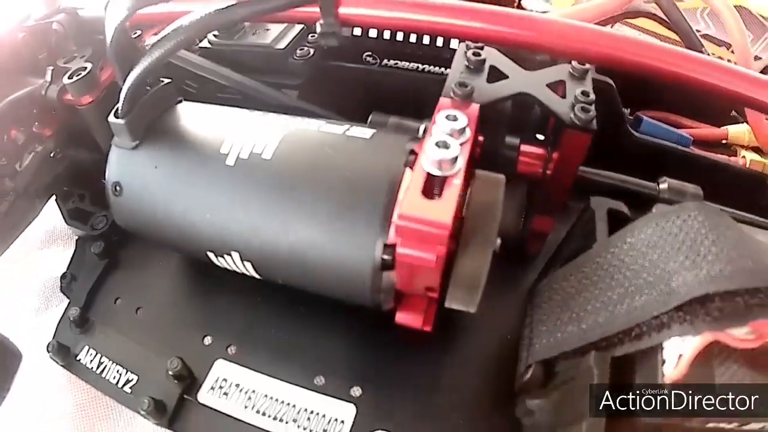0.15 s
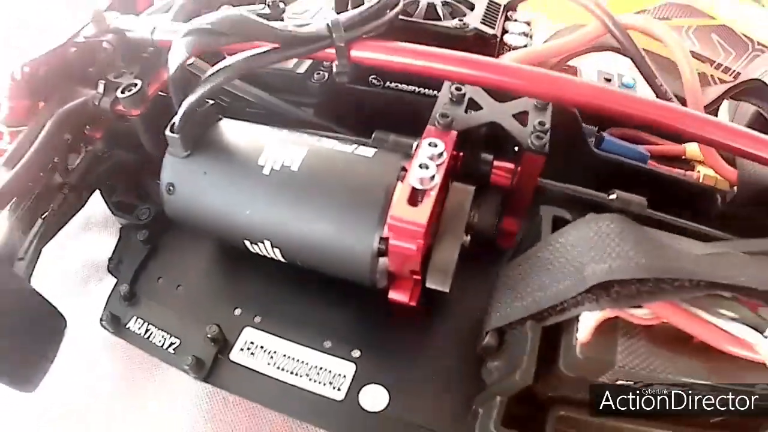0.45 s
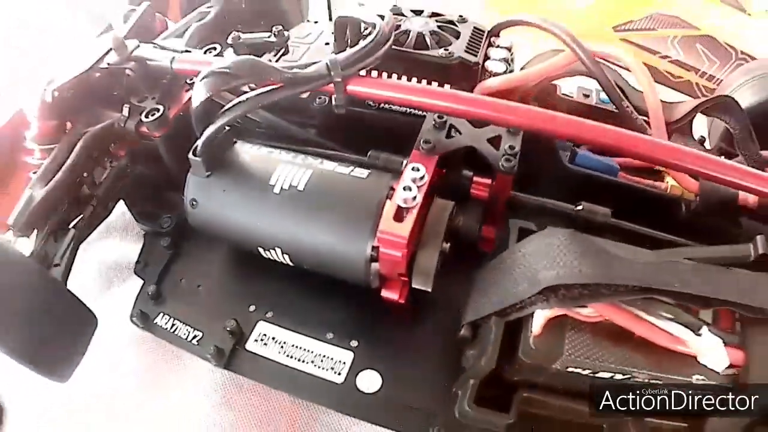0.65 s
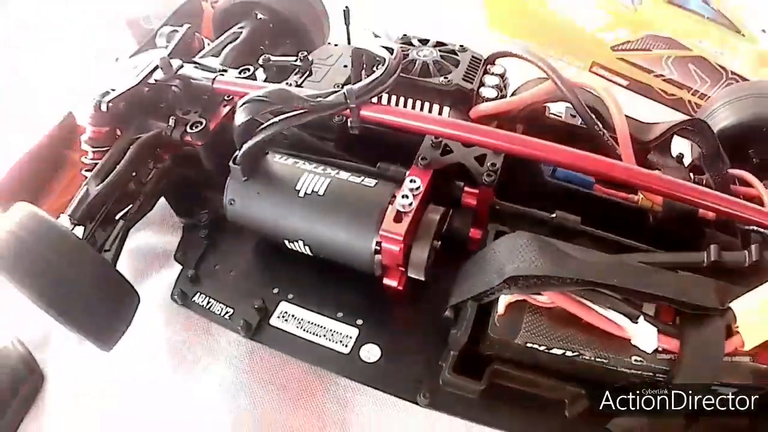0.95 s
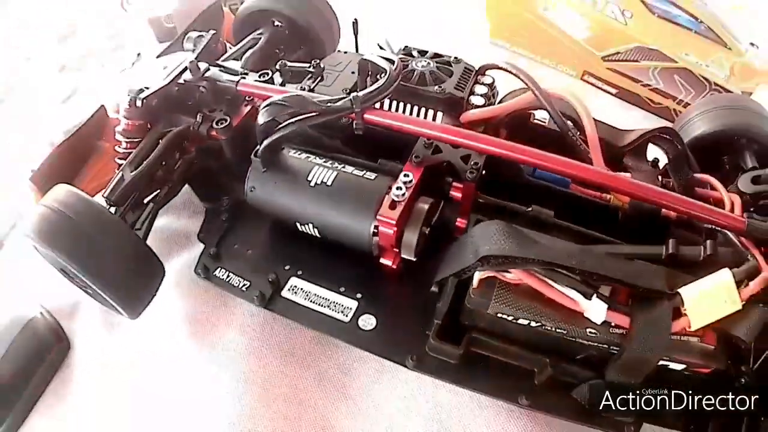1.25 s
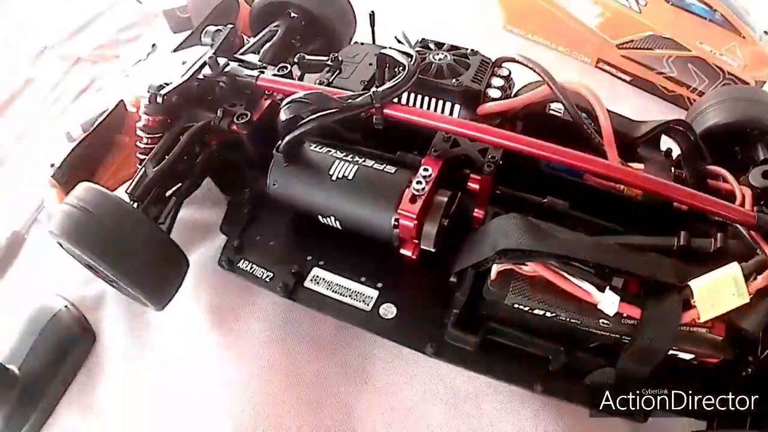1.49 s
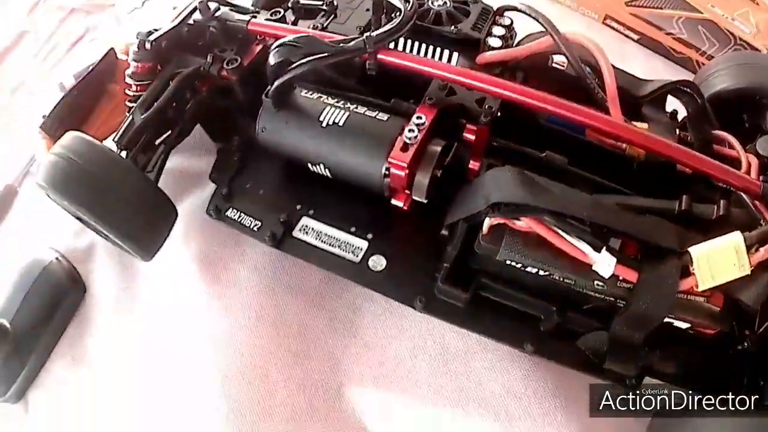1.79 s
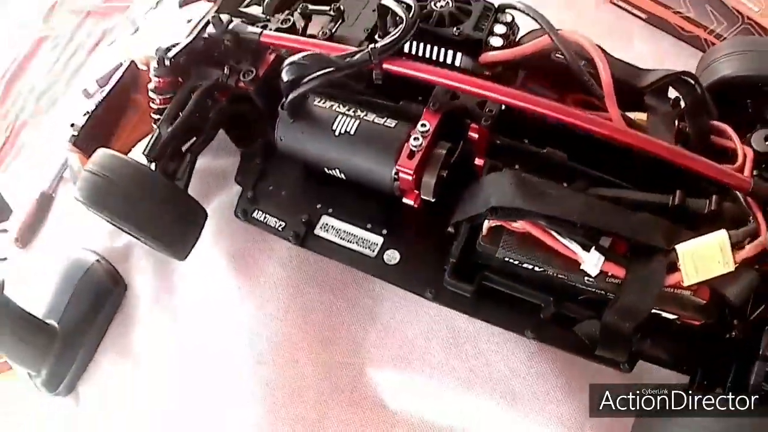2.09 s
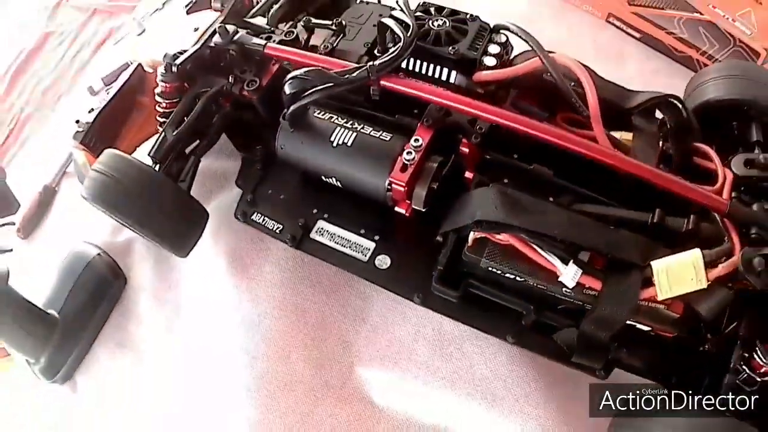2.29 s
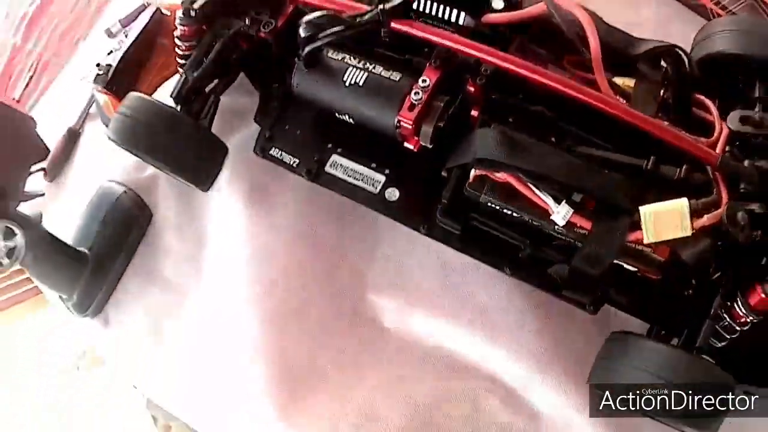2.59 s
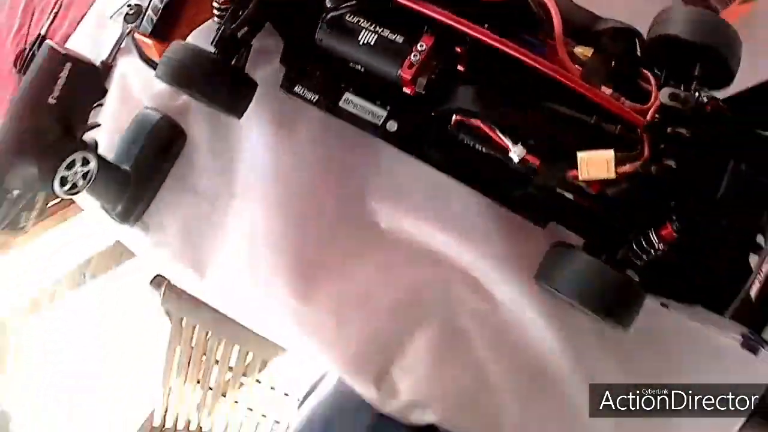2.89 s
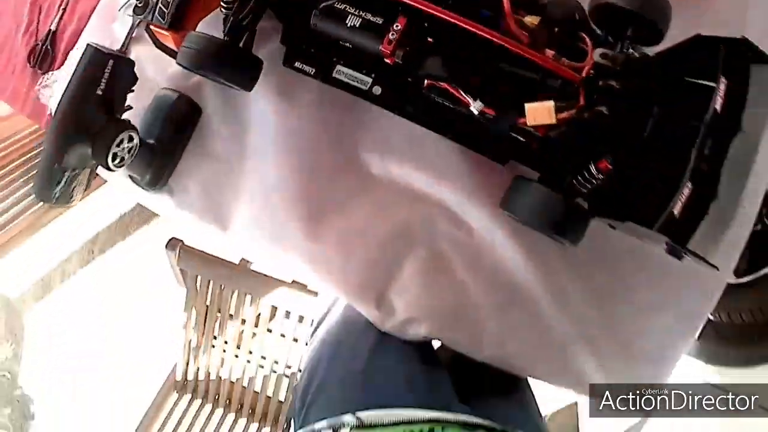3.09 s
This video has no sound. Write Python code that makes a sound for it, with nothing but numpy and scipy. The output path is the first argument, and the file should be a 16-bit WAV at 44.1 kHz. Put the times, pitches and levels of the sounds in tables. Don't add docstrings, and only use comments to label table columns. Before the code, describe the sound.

Spinning gears of a toy-sized electric car grind and whine over a low hum, with fast uneven clattering, slowing and growing quieter over three seconds, in a dry indoor room through a harsh, low-quality microphone.

```python
import sys
import numpy as np
from scipy import signal
from scipy.fft import rfft, irfft
from scipy.io import wavfile
from scipy.ndimage import uniform_filter1d, map_coordinates

SR = 44100
rng = np.random.default_rng(int(sys.argv[2]) if len(sys.argv) > 2 else 0)


def boost_factor(decibels):
    exponent = np.asarray(decibels, float) / 20
    return 10 ** exponent


def unload_wav(signal):
    wavfile.write(
        sys.argv[1],
        SR,
        np.round(np.clip(np.atleast_2d(signal).T, -1, 1) * 32767).astype(np.int16),
    )


N = 143325
TIME = np.arange(N) / SR
START_HZ = 61.52
LOW_SR = 8000


def rms_one(x):
    return x / np.sqrt(np.mean(x ** 2) + 1e-20)


def coloured(x, points):
    hz, db = np.transpose(points)
    edge = 1024
    wide = np.pad(x, edge, mode="reflect")
    f = np.maximum(np.fft.rfftfreq(len(wide), 1 / SR), 1)
    gain = boost_factor(np.interp(np.log(f), np.log(hz), db))
    return irfft(rfft(wide) * gain, len(wide))[edge:-edge]


def filtered(x, hz, kind):
    return signal.sosfilt(signal.butter(2, hz, kind, fs=SR, output="sos"), x)


def drift(rate):
    r = np.exp(-2 * np.pi * rate / SR)
    noise = rng.standard_normal(N + SR)
    return rms_one(signal.lfilter([1], [1, -2 * r, r * r], noise)[SR:])


def resonance(x, hz, width_hz):
    r = np.exp(-np.pi * width_hz / SR)
    feedback = [1, -2 * r * np.cos(2 * np.pi * hz / SR), r * r]
    return signal.lfilter([(1 - r * r) / 2, 0, (r * r - 1) / 2], feedback, x)


def soft_limit(x, ceiling):
    return x / (1 + (x / ceiling) ** 4) ** 0.25


def turns():
    drag_per_s, friction_hz = 0.27, 23.08
    speed_hz = (START_HZ + friction_hz) * np.exp(-drag_per_s * TIME) - friction_hz
    return np.cumsum(speed_hz) / SR


def coast_levels():
    # (time [s], grind [dB], shaft hum [dB], rotor hum [dB])
    coast = [
        (0, -17.5, -32, -41),
        (0.251, -19, -33.5, -37.5),
        (.42, -20.5, -35.5, -42.5),
        (0.599, -22, -34, -37),
        (.9, -24.5, -37, -45.5),
        (1.2, -28, -41.5, -48.5),
        (1.601, -30, -44, -52),
        (2.0, -32, -48, -57),
        (2.501, -32.5, -52.5, -55),
        (3.25, -38, -62.5, -67),
    ]
    s, *columns = np.transpose(coast)
    return [np.interp(TIME, s, column) for column in columns]


def hum(angle, shaft_db, rotor_db):
    rotor_ratio = 2.82
    once = boost_factor(0.27 * drift(21.0)) * np.sin(2 * np.pi * angle)
    twice = boost_factor(-20.5) * np.sin(4 * np.pi * angle + 1)
    rotor = np.sin(2 * np.pi * rotor_ratio * angle + 1.1 * drift(6.7))
    return boost_factor(shaft_db) * (once + twice) + boost_factor(rotor_db + 4.4 * drift(3.6)) * rotor


def teeth(angle, wobble, uneven_db, grit, odd_db):
    teeth_per_turn = 42.3
    count = np.floor(teeth_per_turn * angle + wobble * drift(150.0))
    strength = boost_factor(uneven_db * rng.standard_normal(N) + odd_db * (count % 2))
    clicks = np.abs(np.diff(count, prepend=count[0])) * strength
    grains = rng.standard_normal(N) * boost_factor(3.5 * drift(440.0))
    return rms_one(clicks - uniform_filter1d(clicks, size=200)) + grit * rms_one(grains)


def chassis(x):
    # (frequency [Hz], width [Hz], level [dB], gain at full speed [dB])
    plate_rings = [(682, 230, -7.5, -9), (766.3, 36.6, 2.5, 2.5), (997.4, 84, -0.5, -7),
                   (1337, 49, -4, 10.5), (1645, 210, -18.5, -7), (2237, 210, -8.5, 0.5)]
    out, speed = 0, np.gradient(turns()) * SR / START_HZ
    for k, (hz, width, db, fast_db) in enumerate(plate_rings):
        out = out + (-1) ** k * boost_factor(db + fast_db * speed ** 2) * resonance(x, hz, width)
    return out


def grind(angle, grind_db):
    # (frequency [Hz], level per Hz [dB])
    grind_colour = [(150, -30.5), (420, -11.5), (730, -5), (1270, -3.5), (2300, -8), (3200, -17),
                    (3990, -18)]
    plate_share = 0.54
    mesh = teeth(angle, wobble=0.23, uneven_db=5, grit=8.0, odd_db=4.5)
    both = rms_one(coloured(mesh, grind_colour)) + plate_share * rms_one(chassis(mesh))
    return boost_factor(grind_db + 1.3 * drift(27.0)) * rms_one(both)


def evened(x):
    return x / np.sqrt(uniform_filter1d(x * x, size=150) + 1e-12)


def binding(rows, source, rise_s, fall_s, width_hz, peak_db):
    out = np.zeros(N)
    for s, db, hz in rows:
        near = np.arange(max(int((s - 0.04) * SR), 0), min(int((s + 0.04) * SR), N))
        ring = resonance(source[near], hz, width_hz)
        d = near / SR - s
        swell = np.exp(-0.5 * (d / np.where(d < 0, rise_s, fall_s)) ** 2)
        out[near] += boost_factor(db) * swell * evened(source[near] + boost_factor(peak_db) * ring)
    return out


def thuds(angle):
    # (time of peak [s], level [dB], plate pitch [Hz])
    thud_binds = [(0.027, -10.0, 1020), (0.058, -11.0, 1290), (0.079, -11.0, 1210), (0.133, -12.0, 1380),
                  (0.143, -9.0, 1270), (0.182, -12.0, 1270), (0.259, -12.0, 1280), (0.308, -12.0, 1340),
                  (0.322, -10.0, 1300), (0.338, -9.0, 1080), (0.382, -11.0, 1270), (0.445, -13.0, 1140),
                  (0.473, -12.0, 1310), (0.489, -13.0, 1320), (0.533, -16.0, 1320), (0.562, -14.0, 1000),
                  (0.595, -12.0, 740), (0.621, -16.0, 970), (0.658, -17.0, 1600), (0.689, -14.0, 820),
                  (0.74, -9.0, 1020), (0.812, -13.0, 980), (0.833, -15.0, 1010), (0.863, -12.0, 990),
                  (0.873, -15.0, 1010), (0.908, -13.0, 1080), (0.968, -12.0, 800), (1.0, -16.0, 1020),
                  (1.016, -17.0, 760), (1.033, -19.0, 1000), (1.068, -16.0, 810), (1.144, -18.0, 1160),
                  (1.154, -18.0, 1000), (1.197, -18.0, 1020), (1.241, -15.0, 1140), (1.28, -20.0, 1090),
                  (1.33, -20.0, 1220), (1.364, -22.0, 1030), (1.395, -19.0, 1650), (1.422, -16.0, 1020),
                  (1.448, -20.0, 990), (1.473, -23.0, 1100), (1.52, -19.0, 1210), (1.546, -18.0, 990),
                  (1.577, -19.0, 1070), (1.611, -21.0, 730), (1.647, -17.0, 1200),
                  (1.673, -17.0, 1070), (1.712, -20.0, 780), (1.733, -17.0, 750), (1.767, -16.0, 1200),
                  (1.81, -21.0, 1020), (1.844, -18.0, 1040), (1.887, -15.0, 760), (1.921, -19.0, 1080),
                  (1.957, -21.0, 1200), (1.995, -22.0, 1000), (2.035, -18.0, 1000), (2.081, -23.0, 1310),
                  (2.116, -17.0, 970), (2.156, -18.0, 1040), (2.194, -18.0, 1060), (2.223, -21.0, 1000),
                  (2.236, -16.0, 820), (2.282, -21.0, 1280), (2.325, -18.0, 930), (2.38, -16.0, 1020),
                  (2.421, -16.0, 1020), (2.469, -19.0, 1000), (2.519, -17.0, 760), (2.536, -23.0, 1000),
                  (2.565, -19.0, 1270), (2.575, -23.0, 1230), (2.603, -19.0, 990), (2.623, -19.0, 790),
                  (2.679, -19.0, 780), (2.705, -21.0, 1030), (2.723, -23.0, 760), (2.755, -23.0, 1020),
                  (2.782, -17.0, 740), (2.806, -19.0, 720), (2.86, -19.0, 740), (2.891, -22.0, 1290),
                  (2.921, -20.0, 1000), (2.96, -22.0, 1270), (2.975, -24.0, 970), (2.99, -24.0, 750),
                  (3.056, -23.0, 1000), (3.066, -23.0, 1060), (3.111, -25.0, 1160), (3.139, -23.0, 1070),
                  (3.145, -25.0, 1040), (3.185, -24.0, 1030), (3.203, -23.0, 1010), (3.228, -24.0, 1310)]
    plates = chassis(teeth(angle, wobble=0.3, uneven_db=2, grit=1.0, odd_db=5.0))
    plates = filtered(plates, 2050, "low")
    return boost_factor(-6.5) * binding(thud_binds, plates,
                               rise_s=0.0032, fall_s=0.0044, width_hz=130, peak_db=9)


def rasps(angle):
    # (time of peak [s], level [dB], strongest pitch [Hz])
    rasp_slips = [(0.033, -12.0, 2640), (0.069, -15.0, 2290), (0.116, -11.0, 2560), (0.189, -12.0, 2370),
                  (0.221, -9.0, 2350), (0.262, -16.0, 2270), (0.296, -13.0, 2280), (0.369, -15.0, 2260),
                  (0.411, -15.0, 2170), (0.446, -16.0, 2190), (0.491, -15.0, 2080), (0.531, -14.0, 2050),
                  (0.548, -17.0, 2070), (0.585, -17.0, 2120), (0.621, -13.0, 2020), (0.657, -14.0, 1990),
                  (0.691, -17.0, 1970), (0.736, -13.0, 1890), (0.765, -16.0, 1880), (0.799, -18.0, 1920),
                  (0.828, -17.0, 1850), (0.871, -22.0, 1810), (0.91, -21.0, 2210), (0.945, -20.0, 1810),
                  (1.007, -19.0, 1810), (1.046, -18.0, 2160), (1.087, -23.0, 2110), (1.113, -24.0, 2120),
                  (1.143, -18.0, 1810), (1.194, -20.0, 1890), (1.243, -21.0, 3040), (1.275, -24.0, 3110),
                  (1.325, -23.0, 2060), (1.366, -23.0, 1840), (1.393, -24.0, 1810), (1.419, -26.0, 2850),
                  (1.444, -22.0, 1840), (1.521, -27.0, 2420), (1.546, -27.0, 2450), (1.578, -24.0, 2490),
                  (1.611, -26.0, 2150),
                  (1.646, -23.0, 2100), (1.676, -25.0, 2420), (1.712, -24.0, 2450), (1.732, -24.0, 2490),
                  (1.761, -26.0, 2410), (1.777, -22.0, 2170), (1.808, -21.0, 2420), (1.85, -23.0, 2170),
                  (1.884, -19.0, 3240), (1.922, -20.0, 1980), (1.954, -25.0, 2250), (1.995, -23.0, 2140),
                  (2.032, -22.0, 2310), (2.081, -20.0, 2030), (2.114, -24.0, 2440), (2.154, -21.0, 2020),
                  (2.192, -22.0, 1880), (2.24, -27.0, 1810), (2.285, -23.0, 1860), (2.32, -26.0, 1810),
                  (2.348, -27.0, 1810), (2.416, -23.0, 1810), (2.47, -24.0, 1830), (2.518, -24.0, 2270),
                  (2.568, -30.0, 1960), (2.599, -28.0, 1810), (2.625, -30.0, 2260), (2.676, -26.0, 1910),
                  (2.721, -25.0, 2190), (2.755, -25.0, 2070), (2.859, -31.0, 2000), (2.889, -27.0, 1980),
                  (2.917, -29.0, 1970), (2.961, -29.0, 2000), (2.985, -27.0, 1870), (3.061, -31.0, 1980),
                  (3.11, -32.0, 2000), (3.137, -31.0, 1980), (3.146, -32.0, 1850), (3.202, -32.0, 1960),
                  (3.228, -33.0, 1950)]
    # (frequency [Hz], level per Hz [dB])
    rasp_colour = [(500, -29.5), (1200, -5.5), (1900, 1), (2600, -2), (3200, -1), (3990, -3.5)]
    scrape = coloured(teeth(angle, wobble=0.11, uneven_db=4.5, grit=1.1, odd_db=0), rasp_colour)
    return boost_factor(-2) * binding(rasp_slips, scrape,
                             rise_s=0.0029, fall_s=0.0023, width_hz=450, peak_db=6)


def room(x):
    t60_s = 0.091
    t = np.arange(SR // 5) / SR
    tail = rng.standard_normal(len(t)) * boost_factor(-60 * t / t60_s) * (t > 0.004)
    return signal.fftconvolve(x, tail / np.linalg.norm(tail))[:N]


def rumble(shaft_db):
    steady = coloured(rng.standard_normal(N), [(20, 0.5), (100, 3.5), (300, -13.5), (4000, -63.0)])
    shudder = coloured(rng.standard_normal(N), [(50, -17.5), (120, -3), (300, -5), (600, -7), (4000, -60.5)])
    shake = filtered(rng.standard_normal(N), [210, 480], "band")
    fade = np.exp(-TIME / 0.59)
    low = boost_factor(-58) * rms_one(steady) + boost_factor(shaft_db - 4.5) * rms_one(shudder)
    return low + boost_factor(-35.5) * fade * rms_one(shake)


def scene():
    angle = turns()
    grind_db, shaft_db, rotor_db = coast_levels()
    motor = 1.29 * hum(angle, shaft_db, rotor_db)
    gears = filtered(grind(angle, grind_db) + thuds(angle) + rasps(angle), 380, "high")
    return (motor + gears + boost_factor(-14.5) * room(gears) + rumble(shaft_db))[None]


def thrifty_camera(x):
    # (start [s], length [s], lowest lost frequency [Hz])
    dropouts = [(.055, .04, 3790), (.47, .02, 4050), (.76, .025, 3700), (.80, .05, 3940),
                (.893, .037, 3730), (1.1, .03, 3670), (1.16, .05, 3960), (1.21, .045, 3640),
                (1.464, .03, 3660), (1.864, .07, 3410), (2.022, .03, 3560), (2.535, .002, 3370),
                (2.637, .025, 3400), (2.742, .012, 3600), (3.012, .015, 3170), (3.165, .008, 3480)]
    hop = 128
    low_db, top_db = -30, -12
    floor_db = -38.5
    n, k = np.arange(2 * hop), np.arange(hop)
    window = np.sin(np.pi * (n + 0.5) / (2 * hop))
    waves = np.cos(np.pi / hop * np.outer(k + 0.5, n + 0.5 + hop / 2))
    basis = window * waves * np.sqrt(2 / hop)
    rows = np.pad(x, (hop, 2 * hop - len(x) % hop)).reshape(-1, hop)
    lines = np.hstack([rows[:-1], rows[1:]]) @ basis.T
    s = np.arange(len(lines))[:, None] * hop / LOW_SR
    hz = (k + 0.5) * LOW_SR / 2 / hop

    spread_db = 5 * rng.standard_normal((len(lines), hop // 8)).repeat(8, axis=1)
    step_db = np.interp(hz, [2400, 3500], [low_db, top_db]) + spread_db
    step = boost_factor(step_db) * np.sqrt(np.mean(lines ** 2, axis=1, keepdims=True)) + 1e-9
    step = np.maximum(step, boost_factor(step_db - top_db + floor_db))
    lines = np.round(lines / step) * step

    for start, length, low_hz in dropouts:
        inside = abs(s - start - length / 2) <= (length + hop / LOW_SR) / 2
        lines = lines * np.where(inside & (hz > low_hz), boost_factor(-29), 1)
    halves = lines @ basis
    return (halves[1:, :hop] + halves[:-1, hop:]).ravel()[:len(x)]


def stretched(low):
    # (frequency [Hz], level [dB])
    image_trim = [(4000, 3), (6000, 4), (9000, 3.5), (11000, 9), (13000, 8.5), (15000, 12), (15800, 7)]
    places = TIME * LOW_SR
    return coloured(map_coordinates(low, [places], order=2, mode="nearest"), image_trim)


def low_pass(x):
    return signal.sosfilt(signal.butter(12, 15830, fs=SR, output="sos"), x)


def record(dry):
    low = signal.resample_poly(dry[0], 80, 441, window=("kaiser", 3.0))
    low = thrifty_camera(soft_limit(low, 0.43))
    offset = -0.0025
    mix = (soft_limit(stretched(low), 0.76) + offset)[None]
    return low_pass(mix)


dry = scene()
out = record(dry)
unload_wav(out)
```